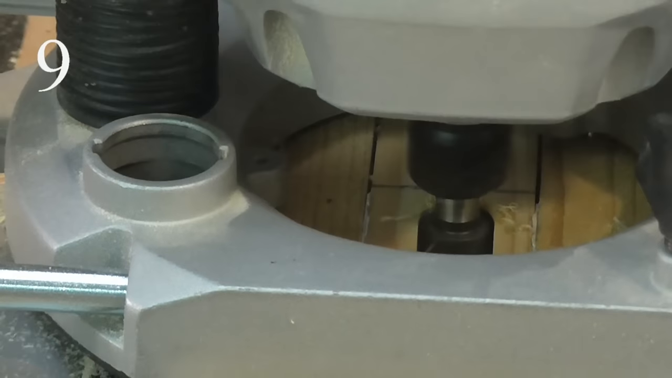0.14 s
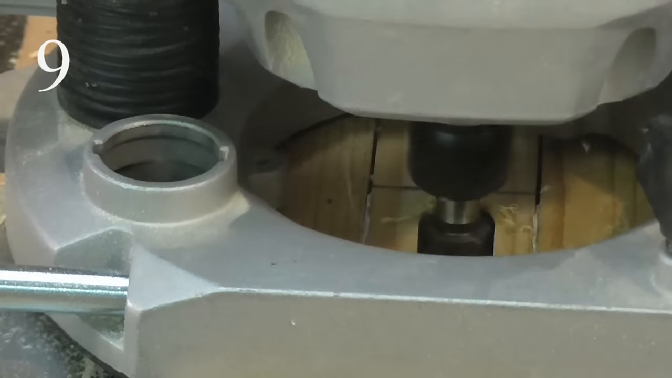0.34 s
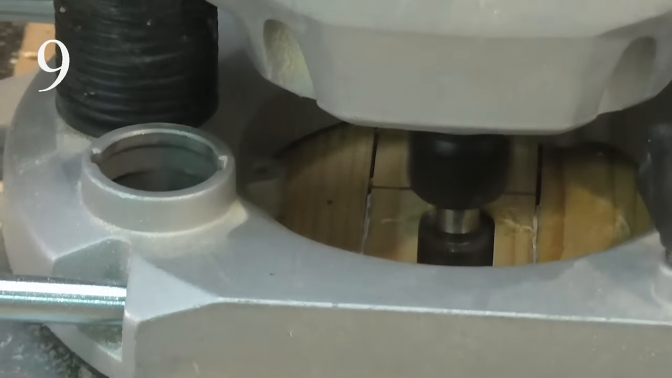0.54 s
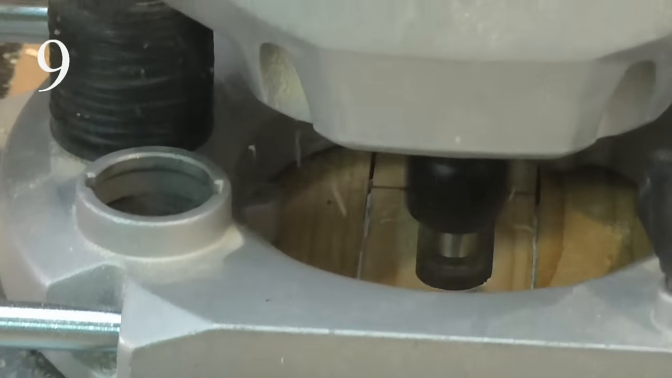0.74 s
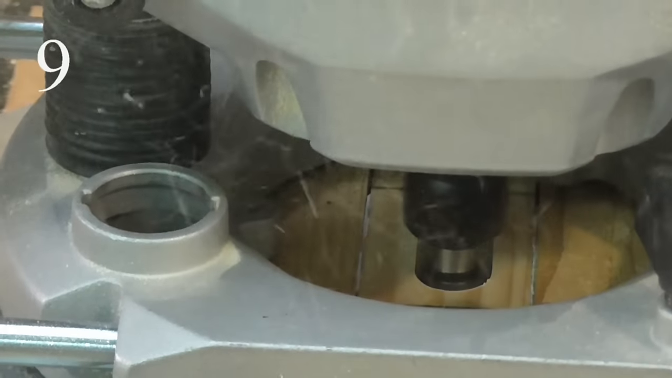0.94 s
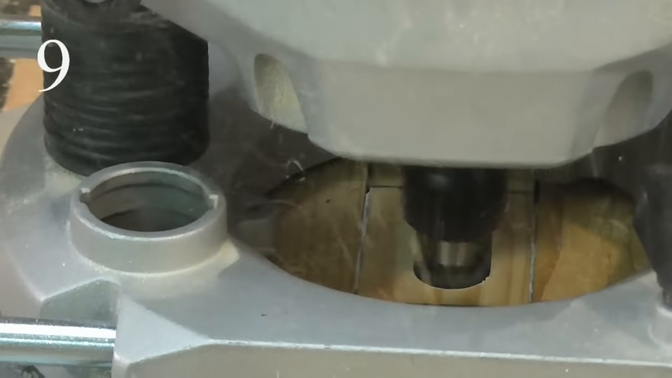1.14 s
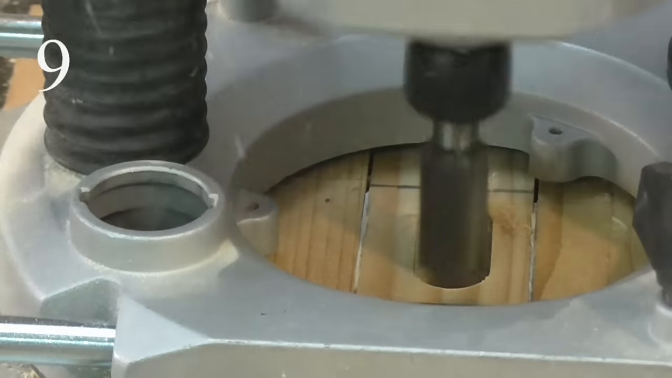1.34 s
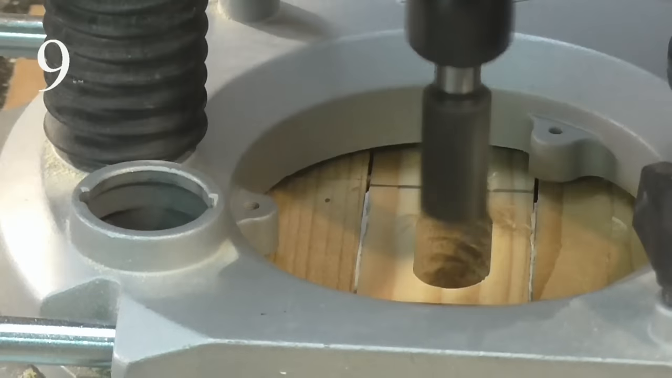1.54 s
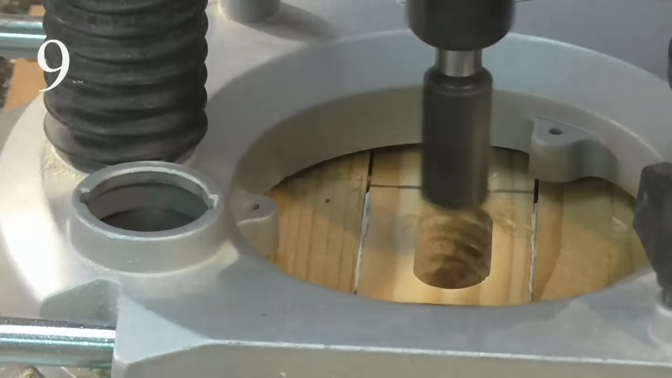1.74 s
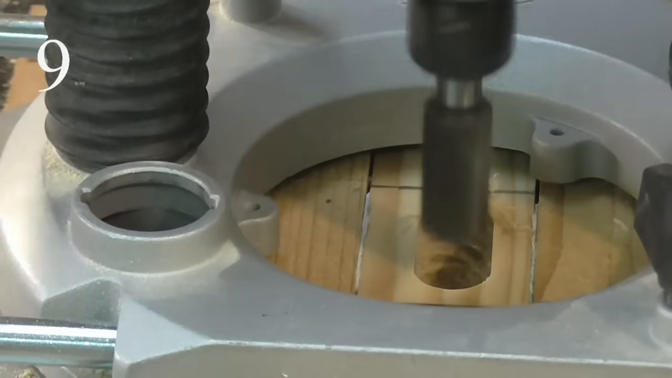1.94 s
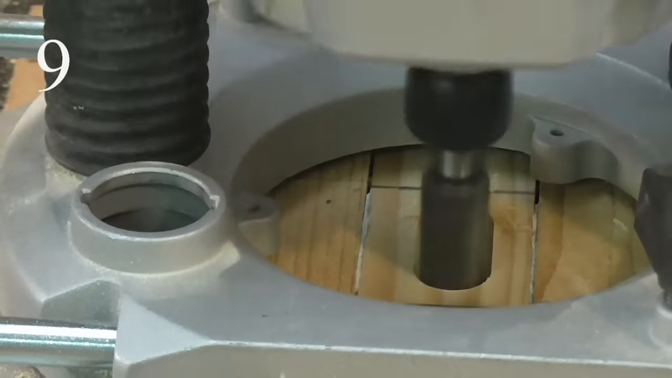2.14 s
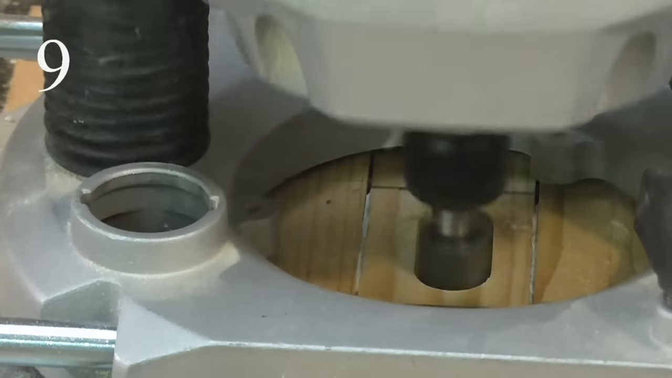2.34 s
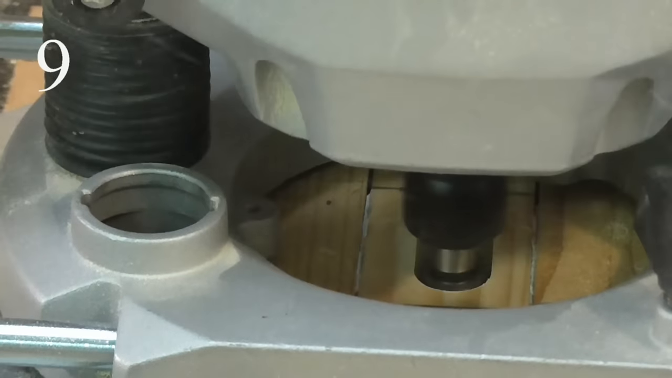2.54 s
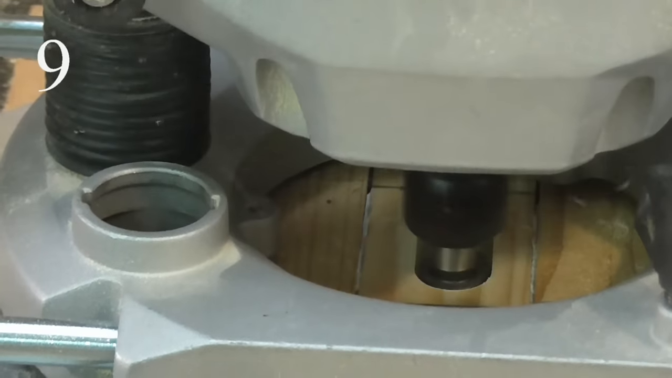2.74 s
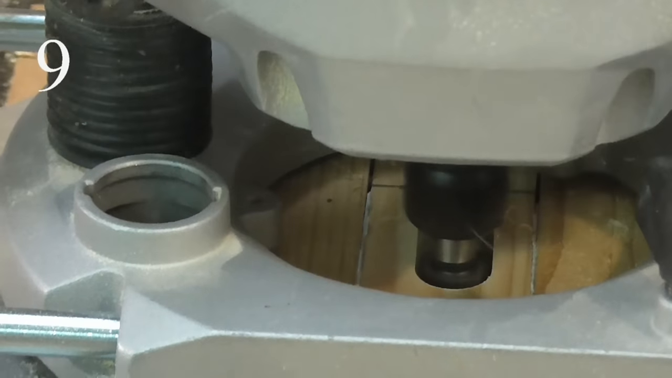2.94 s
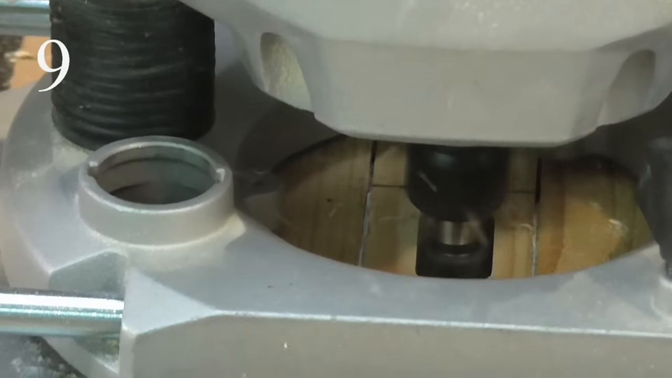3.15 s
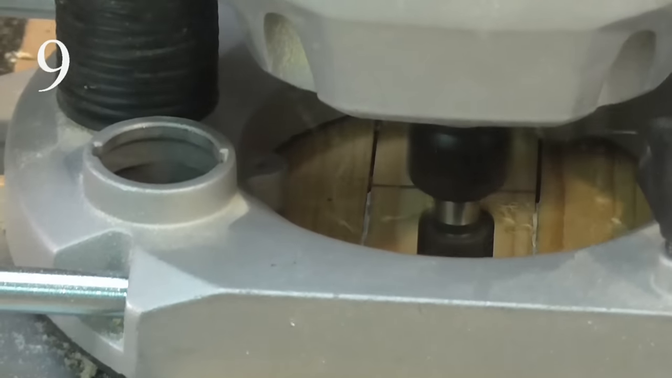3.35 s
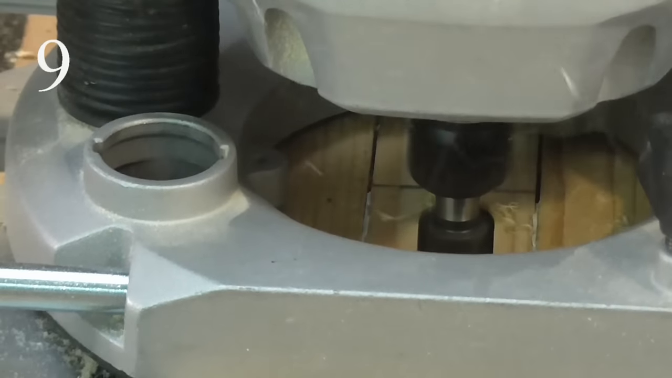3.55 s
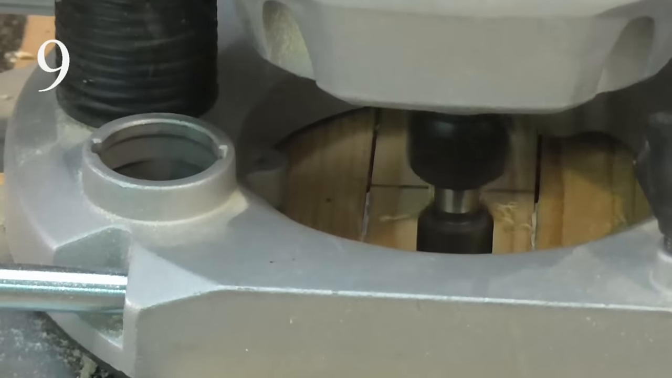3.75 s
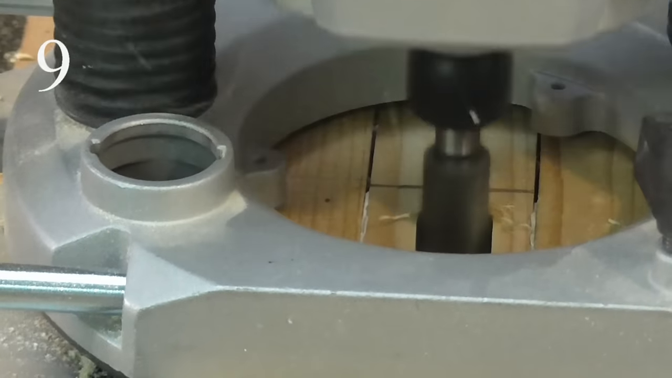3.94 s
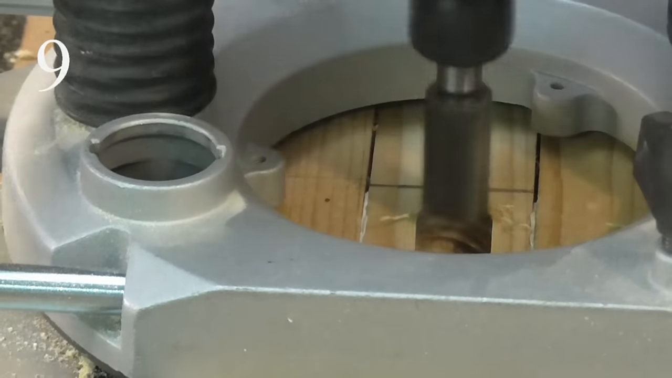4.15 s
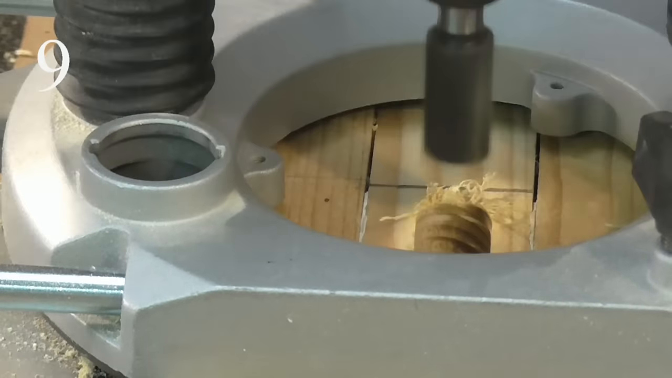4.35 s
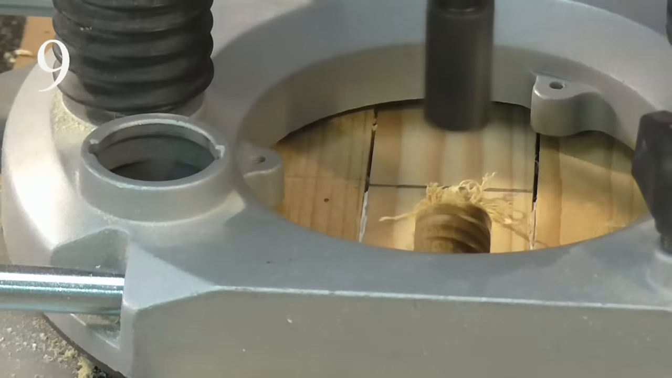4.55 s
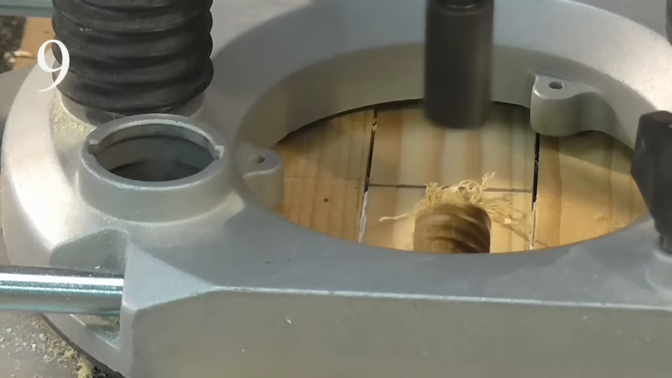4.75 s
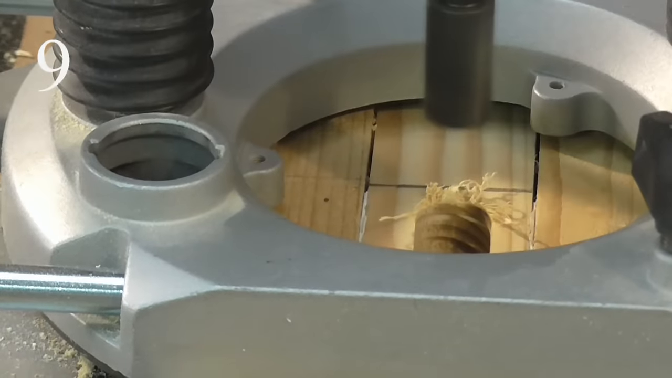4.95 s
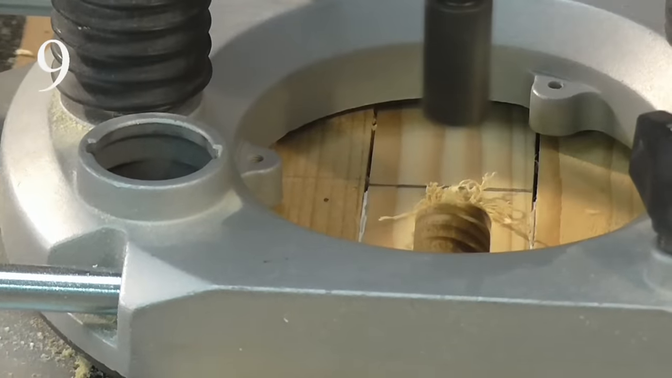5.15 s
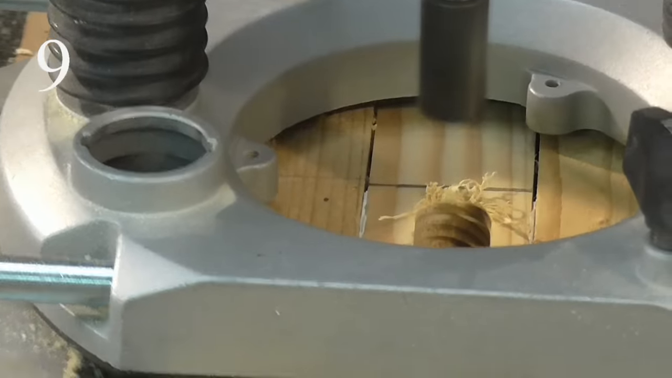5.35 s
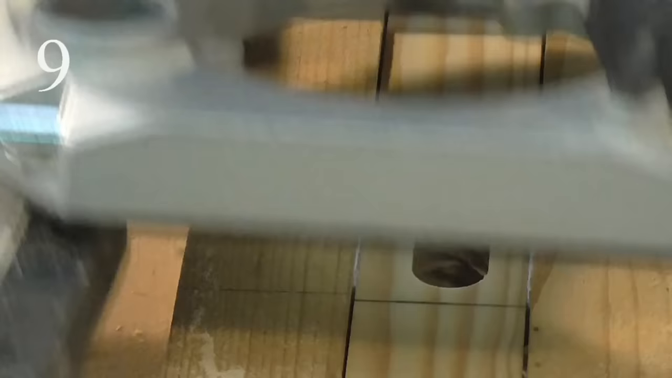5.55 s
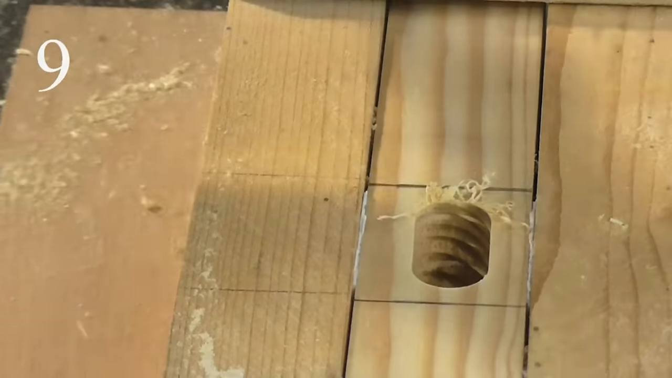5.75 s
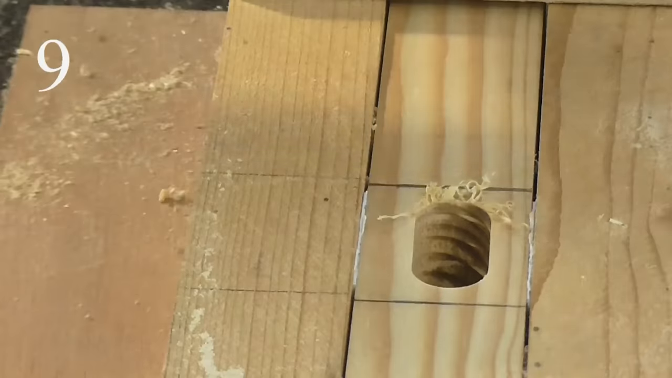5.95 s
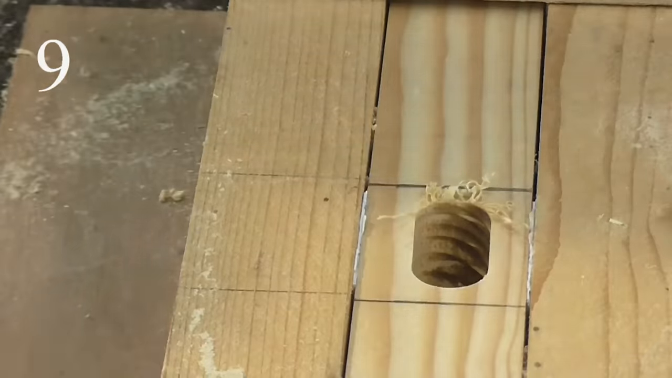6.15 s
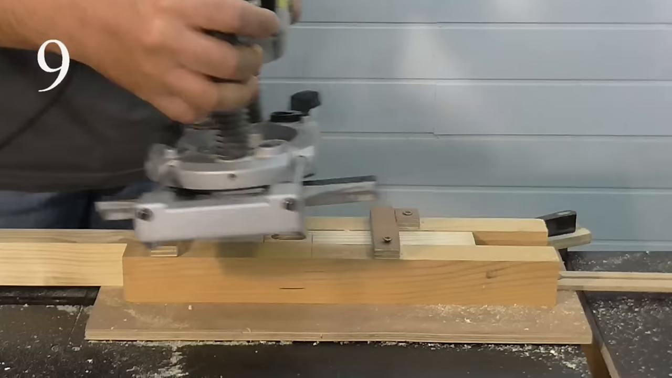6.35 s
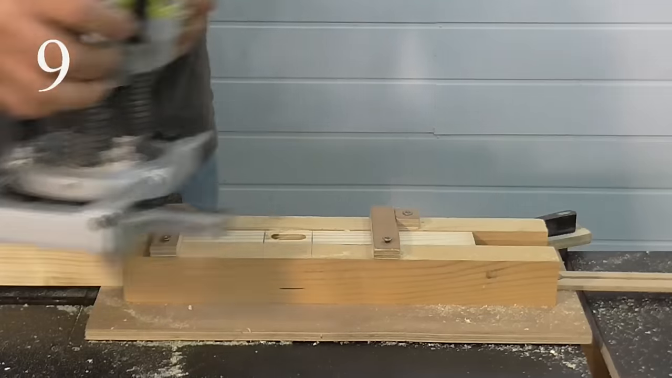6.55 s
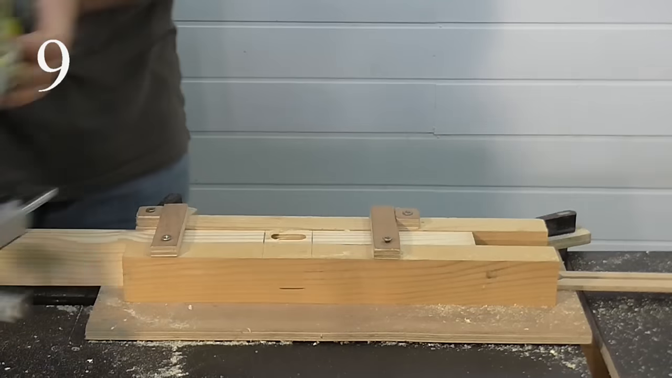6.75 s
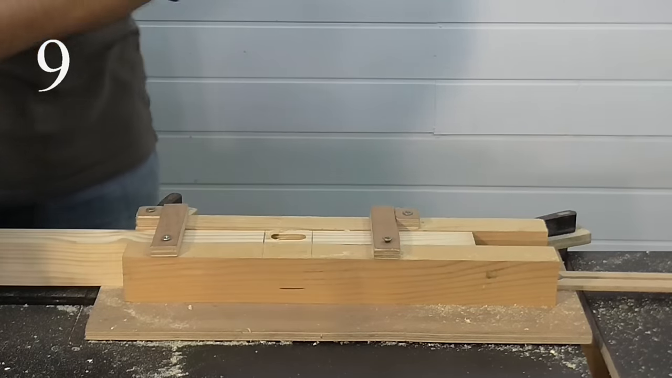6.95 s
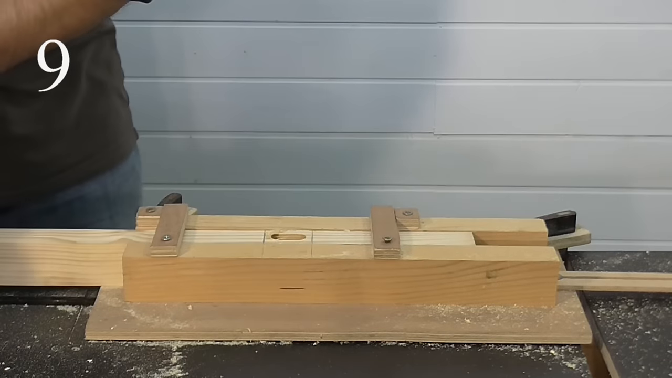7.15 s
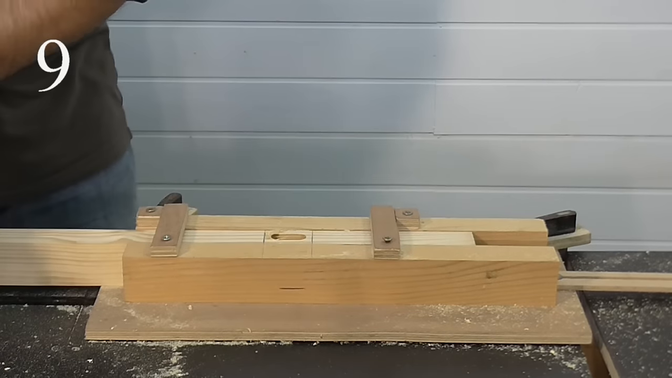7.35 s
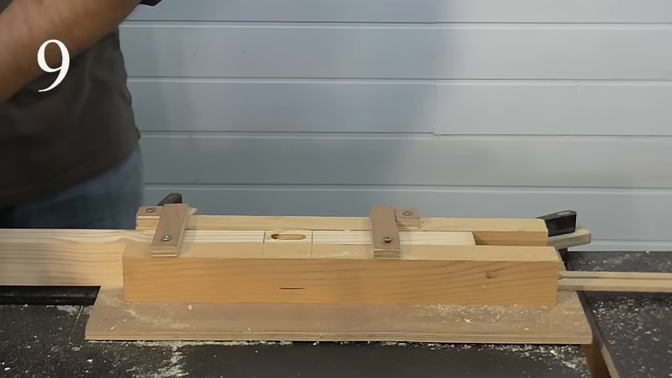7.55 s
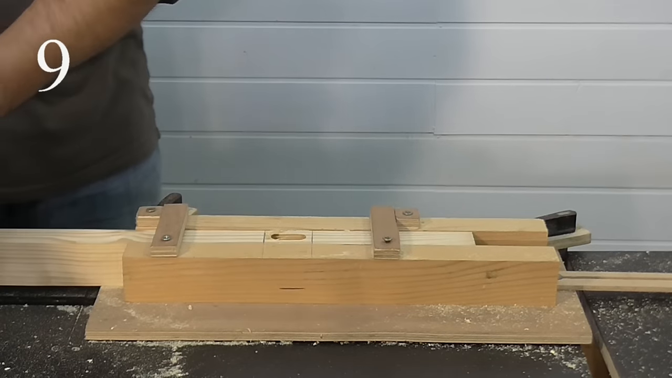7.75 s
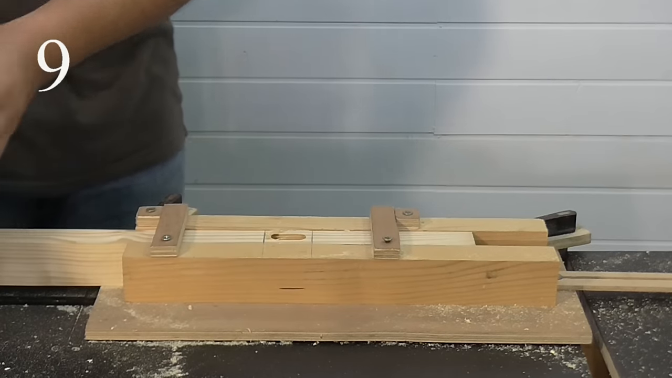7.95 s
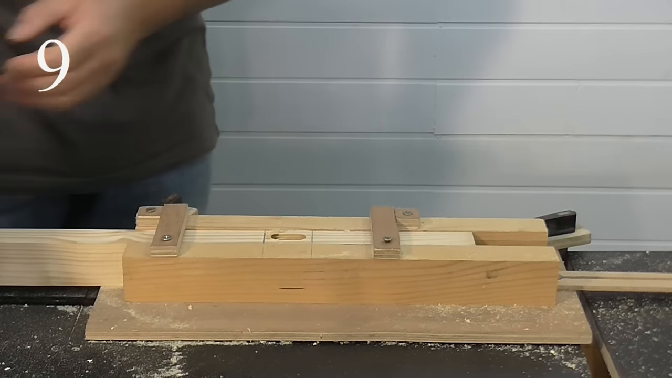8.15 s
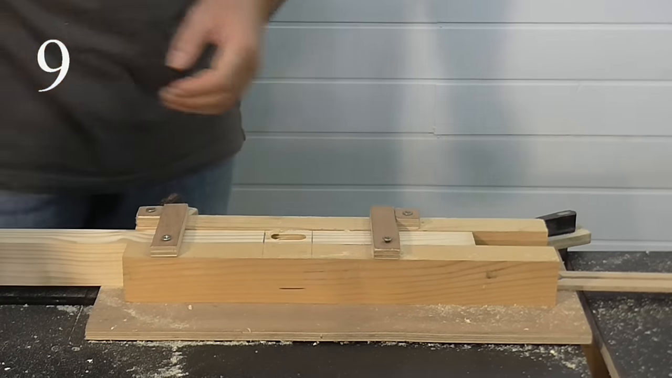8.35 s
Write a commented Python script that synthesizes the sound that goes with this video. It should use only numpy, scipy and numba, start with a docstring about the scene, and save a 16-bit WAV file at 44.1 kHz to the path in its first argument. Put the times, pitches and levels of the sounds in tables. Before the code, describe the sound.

Close up, a hand router whines at full speed in pine, its pitch sagging slightly with each bite over rushing fan air and chip hiss. Switched off, it glides down in pitch and fades before stopping. Abruptly quieter and further off, the machine is set down on a wooden bench with scrapes, a cluster of knocks, tiny metal ticks and cloth rustle, in a lightly echoing workshop.

```python
"""A hand router whines at full speed while its two-edged bit plunges into pine, is switched off, coasts down
and fades. Its tones are sines at multiples of the shaft speed; its roar, fan rush and hiss are filtered noise.
Then, from further off, the machine is set down: noise and short pushes make the modes of a wooden bench ring,
as scrapes and knocks, with small metal ticks and a noise rustle of cloth (two faint knocks come earlier).
Behind this second part lie quiet workshop air, faint steady tones and microphone noise."""
import sys
import numpy as np
from scipy import signal
from scipy.fft import rfft, irfft, next_fast_len
from scipy.io import wavfile
from scipy.ndimage import uniform_filter1d
from numba import njit

SR = 44100
rng = np.random.default_rng(int(sys.argv[2]) if len(sys.argv) > 2 else 0)


def put_to_file(sound):
    """Save the sound as 16-bit audio at rate SR, in the file named by the first command-line argument."""
    columns = np.atleast_2d(sound).T  # one column per channel
    safe = np.clip(columns, -1, 1)
    whole_steps = np.round(safe * 32767)
    wavfile.write(sys.argv[1], SR, whole_steps.astype(np.int16))


N = 374406
T = np.arange(N) / SR  # time in seconds
BENCH_START_S = 6.335  # the router stops being heard; bench scrapes, cloth and workshop start
LEFT_RIGHT = np.array([[1], [-1]])  # opposite signs on the two sides


def undb(db):
    """Decibels to an amplitude factor."""
    return 10 ** (np.asarray(db) / 20)


def unit(x):
    """Scale to an rms of 1."""
    return x / np.sqrt(np.mean(x ** 2))


def curves(table):
    """Columns joined by straight lines in time."""
    s, *columns = np.transpose(table)
    return [np.interp(T, s, column) for column in columns]


def walk(rate):
    """Random levels held 1 / rate seconds and smoothed twice; spread near 1."""
    hold = int(SR / rate)
    steps = np.repeat(rng.standard_normal(N // hold + 1), hold)
    return 1.27 * uniform_filter1d(uniform_filter1d(steps, hold), hold)[:N]


def swells(events, rest_db):
    """dB curves, one per level column: events attack, hold and release; their powers add to a resting level."""
    t = T[::32]  # coarse time steps are enough for levels
    power = undb(rest_db)[:, None] ** 2 + 0 * t
    for s, attack, hold, t60, *db in events:
        rise = np.clip((t - s) / attack, 0, 1)
        release = undb(-60 * np.maximum(t - s - attack - hold, 0) / t60)
        power = power + (undb(db)[:, None] * rise * release) ** 2
    return [np.interp(T, t, 10 * np.log10(p)) for p in power]


def coloured(points):
    """Noise of rms 1 with a spectrum of (Hz, dB) points."""
    hz, db = np.transpose(points)
    size = next_fast_len(N)
    f = np.arange(size // 2 + 1) * SR / size + 1
    spectrum = rfft(rng.standard_normal(size)) * undb(np.interp(np.log(f), np.log(hz), db))
    return unit(irfft(spectrum, size)[:N])


def wide(make, side_db):
    """Left and right from two unrelated draws, as mid and side."""
    return make() + undb(side_db) * make() * LEFT_RIGHT


def pan(x, db):
    """Place a sound by its left minus right level in dB."""
    return x * undb(np.array([db / 2, -db / 2]).reshape(2, -1))


@njit
def svf(x, hz, width):
    """State-variable band-pass with a moving centre, gain 1 there."""
    y, band, low = np.empty(len(x)), 0., 0.
    for i in range(len(x)):
        g, k = np.tan(np.pi * hz[i] / SR), width / hz[i]
        v = (band + g * (x[i] - low)) / (1 + g * (g + k))
        band, low, y[i] = 2 * v - band, low + 2 * g * v, k * v
    return y


def ring(x, modes):
    """Each mode is a decaying sine struck by x."""
    out = 0
    for hz, db, t60 in modes:
        pole = np.exp(2j * np.pi * hz / SR - np.log(1000) / (t60 * SR))
        out = out + undb(db) * signal.lfilter([1], [1, -pole], x).imag
    return out


OFF_S = 3.98  # the current stops
FADE_FROM_S, FADE_TO_S, FADE_FLOOR_DB = 5.317, 6.186, -30.5


def router():
    """Tones and moving air share one turning shaft; the whole machine fades in a straight line to a floor."""
    coast = np.maximum(T - OFF_S, 0)  # seconds since switch-off
    turn = shaft_angle(coast)
    fade = np.clip((FADE_TO_S - T) / (FADE_TO_S - FADE_FROM_S), undb(FADE_FLOOR_DB), 1)
    return (shaft_tones(turn, coast) + moving_air(turn, coast)) * fade * (T < BENCH_START_S)


# Shaft speed under power, sagging while the bit bites. Each row: time in seconds, speed in Hz.
SHAFT_SPEED = [(0, 527), (.3, 517.7), (.6, 523), (.99, 529.4), (1.25, 513.4), (1.39, 514.4), (1.7, 524.7),
               (2.1, 530.4), (2.29, 528), (2.75, 516.8), (3.1, 523.2), (3.52, 529.4), (3.74, 521.5),
               (3.97, 518)]
COAST_S, COAST_TO_HZ = 3.54, 94  # after switch-off the speed relaxes towards this with this time constant


def shaft_angle(coast):
    """The angle in radians is the summed speed, with a tiny unsteadiness."""
    powered_hz = curves(SHAFT_SPEED)[0]
    hz = COAST_TO_HZ + (powered_hz - COAST_TO_HZ) * np.exp(-coast / COAST_S)
    return 2 * np.pi * np.cumsum(hz * (1 + 0.000798 * walk(60))) / SR


FLUTTER_DB, COAST_FLUTTER_DB = 3, 2  # the middle tones drop out briefly, more so while they glide


def shaft_tones(turn, coast):
    """Each order is a sine that many times the shaft speed, with its own wandering level and place."""
    weak_db = -25 * np.clip(coast, 0, .3)  # the weak orders sink once the current stops
    lines = motor_whine() + even_and_weak_tones(weak_db) + coasting_tones() + chatter(weak_db)
    flutter = FLUTTER_DB + COAST_FLUTTER_DB * np.clip(coast / 0.16, 0, 1)
    out = 0
    for order, db in lines:
        if 3 < order < 12:
            db = db - flutter * np.maximum(walk(30), 0) ** 2
        # each tone reaches the two ports along its own path, so its balance and phase wander
        lag = 0.23 * walk(2.15) * LEFT_RIGHT
        level = pan(np.sqrt(2) * undb(db), -4 / order + 0.41 * walk(2.5))
        out = out + level * np.sin(order * turn + 2 * np.pi * rng.random() + lag)
    return out


# The motor's tones swell and sink as the machine moves. There is one list for each shaft order.
# Each row: time in seconds, rms level in dB before the random wander.
MOTOR_LEVELS = { 1: [(0, -44.5), (.15, -43), (.22, -45), (.32, -64), (.45, -49), (.6, -37), (.9, -38.5),
                (1.27, -47), (1.62, -40), (2.05, -49), (2.54, -38.5), (2.62, -43), (2.75, -55.5),
                (2.87, -45), (2.94, -53), (3.02, -41), (3.1, -36.5), (3.5, -43), (3.98, -43.5),
                (4.1, -39.5), (4.18, -50), (4.22, -45), (4.27, -61), (4.33, -42.5), (4.42, -40),
                (4.88, -43.5), (4.95, -53), (5.03, -42.5), (5.2, -53.5), (5.34, -42), (5.62, -51.5),
                (5.84, -54.5), (6.2, -57)], 3: [(0, -47), (.08, -44.5), (.17, -49), (.24, -43), (.32, -42),
                (.36, -60), (.47, -53), (.67, -40.5), (.79, -43.5), (.92, -37.5), (1.0, -44.5), (1.11, -53),
                (1.15, -44), (1.3, -55), (1.39, -44.5), (1.48, -51), (1.55, -45), (1.64, -53), (1.7, -45),
                (2.08, -38), (2.3, -47), (2.49, -49), (2.54, -56), (2.6, -46), (2.66, -54), (2.72, -49),
                (2.86, -56), (2.95, -40), (3.03, -43.5), (3.2, -59), (3.26, -45), (3.33, -47),
                (3.52, -40.5), (3.8, -46), (3.97, -40.5), (4.09, -53), (4.24, -43.5), (4.28, -55),
                (4.35, -44), (4.43, -66), (4.51, -46), (4.6, -49.5), (4.79, -56), (4.93, -55), (5.02, -40),
                (5.22, -43.5), (5.32, -56), (5.49, -48.5), (5.63, -42.5), (5.7, -49), (5.8, -43.5),
                (5.91, -48), (6.0, -45.5), (6.2, -49)], 5: [(0, -67), (.1, -53), (.15, -70), (.5, -66),
                (.75, -53), (.95, -60), (1.05, -50), (1.12, -64), (1.16, -54), (1.45, -65), (1.53, -55),
                (1.8, -57), (2.0, -78), (2.3, -52), (2.55, -55), (2.8, -65), (3.05, -58), (3.3, -52.5),
                (3.55, -58), (3.72, -64), (3.82, -54), (4.16, -70), (4.24, -55), (4.32, -53), (4.4, -56),
                (4.55, -57), (4.8, -60), (4.94, -53), (5.05, -55), (5.14, -62), (5.35, -56), (5.6, -67),
                (5.9, -47.5), (5.98, -54), (6.05, -41.5), (6.13, -52), (6.2, -58)], 7: [(0, -51),
                (.25, -61), (.7, -58), (.95, -65), (1.03, -50), (1.2, -53), (1.3, -66), (2.2, -59),
                (2.45, -57), (2.63, -70), (2.8, -57), (3.2, -65), (3.35, -61), (3.55, -51), (3.7, -63),
                (3.9, -56), (4.2, -66), (6.2, -72)], 8: [(0, -50), (.2, -59), (.95, -55), (1.02, -53),
                (1.15, -52), (1.3, -68), (2.0, -70), (2.1, -54), (2.25, -54.5), (2.7, -58), (2.86, -48),
                (3.0, -60), (3.6, -53), (3.9, -59), (4.2, -57), (6.2, -74)], 11: [(0, -54), (.6, -64),
                (.92, -56), (1.2, -61), (1.95, -59), (2.08, -53), (2.5, -60), (3.0, -58), (4.0, -64),
                (4.22, -54), (4.3, -59), (4.52, -51), (4.65, -54), (4.76, -46), (4.86, -54), (4.94, -48),
                (5.03, -66), (6.2, -68)], 12: [(0, -45), (.39, -53.5), (.6, -45.5), (.9, -55), (1.1, -54),
                (1.28, -53), (1.4, -40), (1.53, -45.5), (1.58, -45), (1.72, -44), (1.82, -52), (1.88, -46),
                (1.98, -53), (2.03, -46), (2.2, -43.5), (2.42, -45.5), (2.54, -59), (2.87, -47.5),
                (3.12, -56), (3.21, -45), (3.5, -52.5), (3.6, -49), (3.85, -47), (3.93, -56), (4.02, -47),
                (4.25, -43.5), (4.44, -48.5), (4.52, -46), (4.75, -42.5), (5.14, -41), (5.25, -40.5),
                (5.36, -39.5), (5.62, -47), (5.76, -58), (5.84, -40.5), (5.94, -50), (6.04, -46),
                (6.2, -46)], 24: [(0, -61), (.7, -63), (.92, -55), (1.2, -64), (1.9, -62), (2.25, -55),
                (2.5, -68), (3.06, -54.5), (3.25, -61), (3.9, -61), (4.4, -68)]}


def motor_whine():
    """The motor's tones follow drawn level curves and waver around them."""
    return [(order, curves(table)[0] + 1.55 * walk(14) + 0.2 * min(order, 12) * walk(60))
            for order, table in MOTOR_LEVELS.items()]


# Swells of the even tones, some from bites into the wood, some while running lightly.
# Each row: start in seconds, attack in seconds, hold in seconds, release in seconds to fall 60 dB,
# rms level in dB of orders 2, 4 and 6, dB added to the weak orders.
EVEN_SWELLS = [(0, 0.058, 0.071, 0.36, -40.5, -54, -65, 7), (.12, 0.0098, 0.16, 0.28, -39, -45, -48.5, -15),
               (.3, 0.045, 0.13, 0.22, -53, -48.5, -47.5, -5), (.5, 0.049, 0.37, .4, -66, -61, -59, 2),
               (.985, 0.0074, 0.011, 0.8, -36.5, -48.5, -44.5, 6),
               (1.05, 0.11, 0.026, 0.53, -33, -60, -46.5, -1),
               (1.32, 0.018, 0.028, 0.82, -47, -67, -58, -5), (1.5, 0.067, 0.084, 0.88, -49.5, -73, -62, 3),
               (2.15, 0.15, 0.2, 0.72, -39.5, -57, -54.5, -3),
               (2.45, 0.11, 0.042, 0.97, -35.5, -57, -52, -4),
               (2.62, 0.15, 0.12, 0.51, -62, -44, -51.5, -1), (2.95, 0.054, 0.098, .2, -64, -54, -57, 7),
               (3.17, .12, .2, .4, -51, -51.5, -54, 0), (3.46, 0.022, 0.035, 0.66, -36, -56, -45, -2),
               (3.55, 0.066, 0.26, 0.37, -40.5, -53, -58, -5)]
# Resting levels under the swells: level in dB of orders 2, 4 and 6, dB added to the weak orders.
EVEN_REST = (-53, -77, -68, 1.5)
# Weaker orders that bit and brushes add. Each row: order, rms level in dB before the swells' change is added.
WEAK_ORDERS = [(10, -61)]


def even_and_weak_tones(weak_db):
    """The even orders of the two-edged bit swell, some with bites, some running lightly; weak orders follow."""
    *even_db, added_db = swells(EVEN_SWELLS, EVEN_REST)
    even = [(order, db + 0.7 * walk(11) + 1.83 * walk(60) + weak_db) for order, db in zip((2, 4, 6), even_db)]
    weak = [(order, db + added_db + 3 * walk(7) + 4 * walk(90) + weak_db) for order, db in WEAK_ORDERS]
    return even + weak


# What is left of the even tones while coasting; the first row also holds before its time.
# Each row: time in seconds, rms level in dB of orders 2, 4 and 6 before the random wander.
COAST_LEVELS = [(3.9, -78, -59, -68), (4.05, -41, -53, -52), (4.15, -49.5, -55, -53),
                (4.3, -49.5, -57, -66), (4.36, -60, -59, -63), (4.5, -62, -63, -67), (4.63, -56, -66, -72),
                (4.72, -43.5, -65, -70), (4.87, -52, -60, -70), (4.95, -54, -56, -68),
                (5.07, -56, -55, -64), (5.17, -59, -61, -60), (5.27, -52, -55, -64), (5.37, -44, -64, -68),
                (5.5, -52, -56, -64), (5.62, -52, -66, -58), (5.77, -64, -52, -60), (5.84, -59, -50, -58),
                (6.2, -52, -55, -54)]


def coasting_tones():
    """The free-running shaft keeps its even orders, swelling and sinking."""
    return [(order, db + 2.3 * walk(30)) for order, db in zip((2, 4, 6), curves(COAST_LEVELS))]


# Bursts of chatter. Each row: start in seconds, attack in seconds, hold in seconds,
# release in seconds to fall 60 dB, chatter level in dB.
CHATTER_BURSTS = [(.05, 0.046, .1, .3, -63), (.42, .03, 0.11, .3, -64), (.63, .02, 0.063, .2, -58),
                  (.85, 0.034, 0.11, .2, -56), (1.03, .02, 0.12, .3, -60), (2.2, .05, 0.09, 0.28, -63),
                  (2.88, .08, 0.18, .3, -61), (3.4, .1, .3, .4, -71)]
# High orders that come up when the bit chatters. Each row: order, level in dB relative to the chatter level.
CHATTER_ORDERS = [(13, -0.5), (14, -5.5), (15, -11), (16, -4), (17, 0), (18, -1.5), (19, 1), (20, -2),
                  (21, -10), (22, -9), (23, -4), (25, -7), (26, -9), (27, -19), (28, -11)]
CHATTER_REST_DB = -68


def chatter(weak_db):
    """A chattering bit brings up the high orders in bursts; they sink fastest after switch-off."""
    chatter_db = swells(CHATTER_BURSTS, [CHATTER_REST_DB])[0]
    return [(order, db + chatter_db + 4.0 * walk(16) + 3 * weak_db) for order, db in CHATTER_ORDERS]


# Moving air. Each row: time in seconds, fan rush level in dB,
# chip hiss level in dB (the housing roar follows this one too).
AIR_LEVELS = [(0, -46.5, -46.5), (.3, -47, -47), (.5, -44.5, -44.5), (.67, -46, -44.5), (.8, -48, -44),
              (.96, -43, -45), (1.05, -46.5, -49), (1.3, -47, -49.5), (1.38, -43.5, -47.5),
              (1.75, -40, -49), (1.95, -40.5, -48.5), (2.15, -42.5, -48), (2.33, -46, -48),
              (2.6, -46, -47.5), (2.89, -44, -44.5), (3.23, -47, -45), (4.1, -45, -45.5),
              (4.53, -40.5, -49), (4.8, -41.5, -50), (5.3, -43.5, -50.5), (6.2, -42, -50.5)]
# Colour of the chip hiss. Each row: frequency in Hz, relative level in dB per Hz.
HISS_COLOUR = [(2000, -45), (5000, -3.5), (7000, -7), (7800, -2), (8800, 0.5), (10200, -2.5), (11500, -3),
               (13000, -8), (15000, -23), (16500, -32)]
ROAR_DB, ROAR_FOLLOWS, HISS_USUAL_DB, AIR_PAN_DB = -44.5, 0.94, -47, -0.66
ROAR_COAST_DB_PER_S = 2.5  # the roar outlasts the hiss once the current stops
FAN_HZ, FAN_USUAL_DB, FAN_HZ_PER_DB = 4780, -48, 26  # a louder rush is brighter
FAN_SINK_S, FAN_SINK_HZ_PER_S = 4.45, 460  # from about half a second into the coast the rush sinks in pitch


def moving_air(turn, coast):
    """Housing roar, fan rush and chip hiss are noises; the last two throb gently once a turn."""
    fan_db, hiss_db = curves(AIR_LEVELS)
    roar_db = ROAR_DB + ROAR_FOLLOWS * (hiss_db - HISS_USUAL_DB) + ROAR_COAST_DB_PER_S * coast
    fan_hz = FAN_HZ + FAN_HZ_PER_DB * (fan_db - FAN_USUAL_DB)
    fan_hz = fan_hz - FAN_SINK_HZ_PER_S * np.maximum(T - FAN_SINK_S, 0)
    housing = wide(roar, -12.0) * undb(roar_db + 1.0 * walk(12))
    fan = wide(lambda: rush(fan_hz), -14.5) * undb(fan_db + 0.54 * walk(12))
    hiss = wide(lambda: coloured(HISS_COLOUR), -12.5) * undb(hiss_db + 0.58 * walk(11))
    throb = 1 + 0.18 * np.sin(turn)
    return pan(housing + throb * (fan + hiss), AIR_PAN_DB)


# Colour of the roar. Each row: frequency in Hz, relative level in dB per Hz.
ROAR_COLOUR = [(30, -38), (85, -32.5), (130, -23.5), (250, -14), (450, -4.5), (800, 2), (1600, 4),
               (1720, 0), (1850, -6.5), (2050, -3), (2270, -8), (2500, -4.5), (2760, -4.5), (2950, -2.5),
               (3350, -5.5), (3600, -5.5), (4000, -3), (5000, -13.5), (9000, -20)]
# Hollow resonances of the housing. Each row: frequency in Hz, width in Hz, dB over the roar.
HOUSING_MODES = [(592, 44, -6), (754, 9.2, -1.5), (872, 21, -11), (1310, 12, -5), (4250, 38, -3),
                 (6480, 570, 4)]


def roar():
    """Turbulent air in the housing, lifted at its hollow resonances."""
    air = coloured(ROAR_COLOUR)
    return air + sum(undb(db) * svf(air, hz * (1 + 0.0043 * walk(3.1)), 1. * width)
                     for hz, width, db in HOUSING_MODES)


# Resonances of the air duct. Each row: frequency in Hz, width in Hz, dB over the fan rush before its wander.
DUCT_MODES = [(4750, 200, -5.5), (5290, 370, -11.5)]


def rush(hz):
    """Fan air round a moving centre, lifted where the air duct resonates."""
    centre = np.maximum(hz, 100)
    air = svf(svf(rng.standard_normal(N), centre, 2200.0), centre, 2200.0)
    duct = sum(undb(db + 3.4 * walk(8.8)) * svf(air, f * (1 + 0.014 * walk(5.5)), 1. * width)
               for f, width, db in DUCT_MODES)
    return unit(air + duct)


# Knocks on the bench. Each row: start in seconds, peak level in dB before the low cut,
# centre of the struck modes in Hz, spread in octaves, left minus right in dB.
BENCH_KNOCKS = [(.112, -55, 132, 0.2, -5), (2.58, -57, 132, 0.2, -6), (6.3407, -38.5, 445, 0.46, -3),
                (6.343, -41, 550, 1.2, -3), (6.348, -39, 900, 1.3, -1), (6.344, -46, 150, 0.29, -3),
                (6.761, -44, 150, .4, -2), (6.746, -37.5, 730, 0.2, -2), (6.821, -48, 1700, 0.23, -1),
                (7.2137, -24, 1200, 0.44, -3), (7.2156, -20.5, 960, 0.3, 3), (7.2415, -36, 800, 0.45, -1),
                (7.252, -24.5, 1150, 0.37, 8), (7.2578, -28, 380, 0.45, -2), (7.264, -24, 620, 0.36, -2),
                (7.2755, -22, 700, 0.53, -3), (7.3436, -31, 2000, 0.42, 9), (7.347, -29, 750, 0.48, -1),
                (7.361, -31, 755, 0.22, -7), (7.371, -29, 1000, 0.65, 4), (7.489, -40, 760, .5, -1),
                (7.6441, -19, 383, 0.17, -2.5), (7.646, -33, 125, .4, -1), (7.647, -29, 457, 0.36, -2),
                (7.671, -29, 360, 0.17, -1), (7.689, -34, 360, 0.14, -2), (7.719, -35.5, 450, 0.4, -2),
                (7.782, -41, 350, 0.33, -2), (7.725, -49, 125, 0.44, -3), (8.027, -44, 170, 0.53, -4)]
# Modes of bench and jig. Each row: frequency in Hz, strength in dB,
# seconds to fall 60 dB when ringing freely (knocks and slides shorten this).
BENCH_MODES = [(107, -14, 0.13), (140.6, 1, 0.3), (192, -4, 0.14), (239, 6, 0.27), (292, 0, 0.56),
               (364, 5, 0.083), (438, 6, 0.075), (508, 11, 0.13), (637, -4, 0.077), (670, 4, 0.13),
               (748, 4, 0.21), (824, 13, 0.048), (995, -5, 0.14), (1096, 7, 0.11), (1187, 16, 0.026),
               (1360, 12, 0.028), (1502, 4, 0.1), (1750, -10, 0.036), (1900, -6, .05), (2080, -10, 0.22),
               (2240, -12, .04)]


def knocks():
    """Each blow strikes the bench modes round its own centre: soft blows push longer and ring low."""
    out, hz = np.zeros((2, N)), np.array(BENCH_MODES)[:, 0]
    t = np.arange(SR // 2) / SR
    for s, db, centre_hz, octaves, pan_db in BENCH_KNOCKS:
        i = int(s * SR)
        push = np.sin(np.pi * np.clip(t * 2.0 * centre_hz, 0, 1)) ** 2
        share_db = -6 * (np.log2(hz / centre_hz) / octaves) ** 2
        struck = [(f, g + share, 0.45 * t60) for (f, g, t60), share in zip(BENCH_MODES, share_db)]
        blow = ring(push, struck)[:N - i]
        out[:, i:i + len(blow)] += pan(blow / np.abs(blow).max() * undb(db), pan_db)
    return out


# Small metal ticks of the machine. Each row: start in seconds, rough peak level in dB, pitch in Hz.
METAL_TICKS = [(6.8194, -58, 5640), (7.0375, -54, 4860), (7.235, -57, 4340), (7.3422, -59, 2510),
               (7.4165, -57, 5420), (7.4909, -52, 3900), (7.666, -48, 4080)]


def ticks():
    """Short bright noise bursts round one pitch."""
    out, t = np.zeros(N), np.arange(SR // 20) / SR
    for s, db, hz in METAL_TICKS:
        noise = unit(svf(rng.standard_normal(len(t)), np.full(len(t), 1. * hz), 3000.))
        i = int(s * SR)
        out[i:i + len(t)] += undb(db - 10) * noise * np.exp(-t / 0.005)  # noise peaks about 10 dB over its rms
    return out


# Slides over the bench. Each row: start in seconds, attack in seconds, hold in seconds,
# release in seconds to fall 60 dB, drive in dB of six groups of modes from low to high.
BENCH_SLIDES = [(6.338, 0.0021, .01, 0.39, -54, -56.5, -54, -57, -63.5, -69),
                (6.501, 0.067, 0.18, .3, -70, -70, -68, -73, -71, -80),
                (6.745, 0.0036, .005, 0.55, -58, -57, -57, -61, -72, -81),
                (6.8, 0.13, .06, 0.42, -53.5, -46, -53.5, -55, -62, -63),
                (6.94, 0.034, 0.054, 0.37, -49.5, -44, -70, -54, -69, -75),
                (7.216, 0.0025, 0.013, 0.29, -66, -39.5, -54, -36, -40.5, -59),
                (7.235, 0.011, 0.041, 0.32, -64, -45, -54, -36.5, -51, -64),
                (7.34, 0.0025, 0.02, 0.41, -66, -43, -51.5, -36, -45.5, -60),
                (7.39, .02, 0.029, 0.22, -73, -56, -67, -57, -58, -64),
                (7.47, 0.022, 0.043, 0.38, -73, -61, -70, -64, -58, -64),
                (7.565, .015, 0.057, 0.2, -75, -64, -67, -65, -60, -65),
                (7.647, 0.0024, 0.0018, 0.11, -49, -41, -37, -47, -52, -74),
                (7.66, 0.024, 0.02, 0.18, -56, -56, -59, -62, -61, -76),
                (7.705, 0.013, 0.03, 0.37, -66, -64, -55, -66, -68, -82),
                (7.8, 0.075, 0.12, .3, -71, -78, -78, -74, -74, -89),
                (8.025, .005, 0.059, 0.32, -58, -61, -66, -68, -64.5, -72),
                (8.16, 0.016, 0.0046, 0.16, -63, -71, -83, -88, -86, -95)]


def slides():
    """The machine slides on the bench and sets six groups of its modes ringing."""
    held = [(f, g, 0.51 * t60) for f, g, t60 in BENCH_MODES]  # the load on the bench damps it
    groups = held[:2], held[2:5], held[5:8], held[8:13], held[13:18], held[18:]
    drives_db = swells(BENCH_SLIDES, (-84, -91, -86, -88, -104, -104))
    return sum(shaken(modes, db, -12.0) for modes, db in zip(groups, drives_db))


def shaken(modes, drive_db, side_db):
    """Uneven slips drive a group of modes, which ring on after the push."""
    slips = wide(lambda: rng.standard_normal(N) * undb(2.2 * walk(120)), side_db)
    edges_hz = [0.95 * modes[0][0], 1.155 * modes[-1][0]]
    band = signal.butter(3, edges_hz, "band", fs=SR, output="sos")
    body = lambda x: signal.sosfilt(band, ring(x, modes))
    click = np.arange(SR // 2) == 0  # tests how strongly the group answers
    return body(slips * undb(drive_db)) / np.sqrt(np.sum(body(click) ** 2))


# Rustles of cloth. Each row: start in seconds, attack in seconds, hold in seconds,
# release in seconds to fall 60 dB, rustle level in dB, fine rustle level in dB.
CLOTH_RUSTLES = [(6.34, 0.0074, 0.0046, 0.65, -68.5, -79), (6.5, 0.044, 0.19, 0.32, -72, -86),
                 (6.78, 0.1, 0.11, 0.53, -68, -81), (7.22, 0.013, 0.034, 0.16, -57.5, -76),
                 (7.345, .003, 0.0056, .2, -64, -85), (7.39, 0.028, .005, 0.27, -62, -79),
                 (7.46, 0.026, 0.11, 0.7, -65.5, -86), (7.65, 0.026, .005, .3, -71, -82),
                 (7.8, 0.22, .05, 0.49, -68, -66.5), (8.42, 0.024, .005, 0.23, -69, -76)]


def rustles():
    """Cloth and dust rub as two bands of soft noise, one finer than the other."""
    rustle_db, fine_db = swells(CLOTH_RUSTLES, (-88, -93))
    soft = [(1500, -4.5), (3500, -3.0), (5500, -2.0), (8000, -13.0), (14000, -43)]  # (Hz, dB per Hz)
    fine = [(5000, -8), (8000, -2), (11000, -1), (14000, -6), (16000, -20)]
    out = wide(lambda: coloured(soft), -14) * undb(rustle_db + 2.0 * walk(40))
    return out + wide(lambda: coloured(fine), -7) * undb(fine_db)


ROOM_T60_S, ROOM_DB = 0.66, -14


def room(x):
    """Decaying noise tail, duller than the direct sound, nearly alike at both ports."""
    t = np.arange(int(.6 * SR)) / SR
    mid, side = rng.standard_normal((2, len(t))) * np.exp(-np.log(1000) * t / ROOM_T60_S) * (t > .006)
    tail = signal.lfilter([.4], [1, -.6], mid + 0.14 * side * LEFT_RIGHT)
    tail = tail / np.sqrt(np.sum(tail ** 2) / 2)
    return signal.fftconvolve(x, tail, axes=1)[:, :N] * undb(ROOM_DB)


# Colour of the still air. Each row: frequency in Hz, relative level in dB per Hz.
SHOP_AIR = [(24, -43), (40, -13), (162, 2.5), (218, -3), (1100, -16), (2330, -22.5), (5580, -17),
            (6160, -22), (13300, -27), (15500, -32)]
# Colour of what differs left and right. Each row: frequency in Hz, relative level in dB per Hz.
SHOP_AIR_SIDE = [(24, -43), (40, -16), (170, -6.5), (577, -7), (2710, -26), (12700, -37), (15500, -45)]
# Faint tones of distant electrical gear. Each row: frequency in Hz, rms level in dB before the random wander.
GEAR_TONES = [(75, -80), (140, -92), (495, -92), (1104, -87), (2710, -87.5), (3750, -91), (3265, -88),
              (4060, -88), (4855, -88), (5600, -92), (5670, -86), (7095, -89)]
SHOP_DB = -68


def shop():
    """Still air as noise, with a few faint steady tones of distant electrical gear."""
    hum = 0
    for hz, db in GEAR_TONES:
        angle = 2 * np.pi * np.cumsum(hz * (1 + 0.00098 * walk(16))) / SR
        hum = hum + np.sqrt(2) * undb(db + 2.0 * walk(8.5)) * np.sin(angle)
    air = coloured(SHOP_AIR) + undb(3.5) * coloured(SHOP_AIR_SIDE) * LEFT_RIGHT
    return (air * undb(SHOP_DB) + hum) * (T >= BENCH_START_S)


MIC_DB = -74


def microphone_noise():
    """The microphone's own noise, a soft wide hiss."""
    colour = [(300, -5), (1000, 4), (6000, -8), (13000, -23), (16000, -38)]  # (Hz, dB per Hz)
    return wide(lambda: coloured(colour), -4) * undb(MIC_DB) * (T >= BENCH_START_S)


def scene():
    """The router first, then the bench sounds over the quiet workshop; only knocks and ticks echo."""
    low_cut = signal.butter(5, 95, "high", fs=SR, output="sos")  # the knocks lose their deep bass below about 95 Hz
    hits = signal.sosfilt(low_cut, knocks()) + ticks()
    drag = (slides() + rustles()) * (T >= BENCH_START_S)
    return router() + hits + room(hits) + pan(drag, -0.42) + shop() + microphone_noise()


TOP_HZ = 15750


def record(dry):
    """The microphone loses the deep bass; the recorder cuts the top."""
    dry = signal.sosfilt(signal.butter(2, 40, "high", fs=SR, output="sos"), dry)
    return signal.sosfilt(signal.ellip(10, .2, 80, TOP_HZ, fs=SR, output="sos"), dry)


dry = scene()
out = record(dry)
put_to_file(out)
```